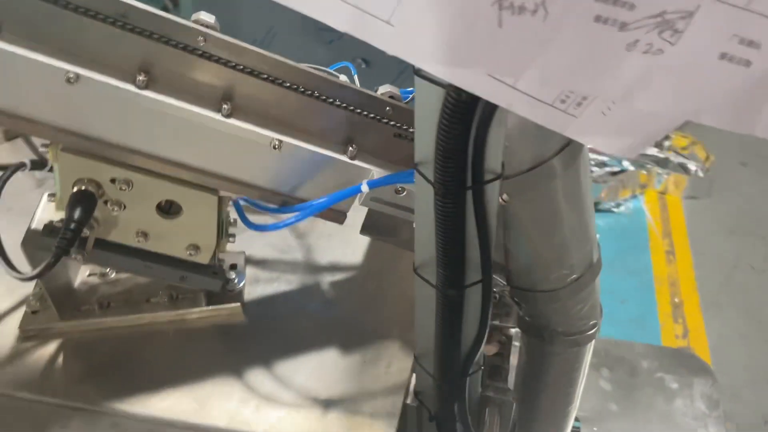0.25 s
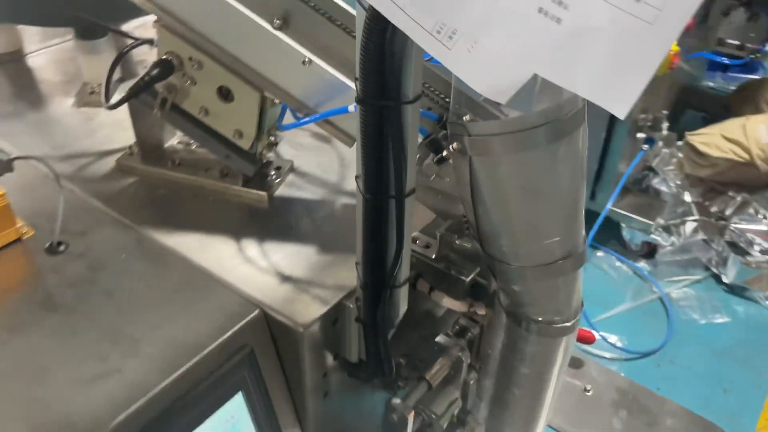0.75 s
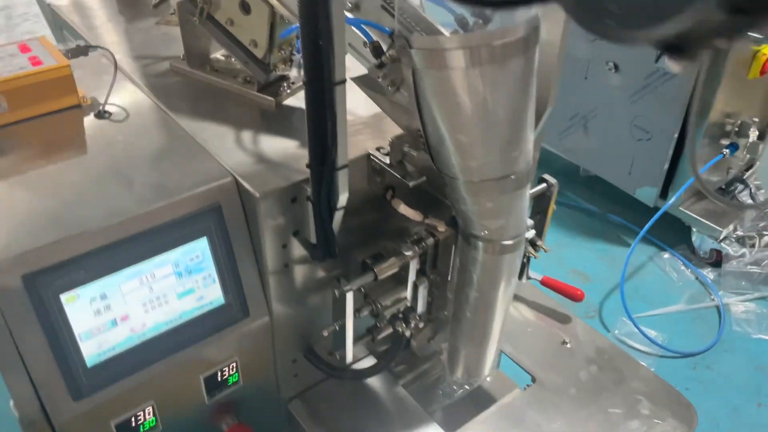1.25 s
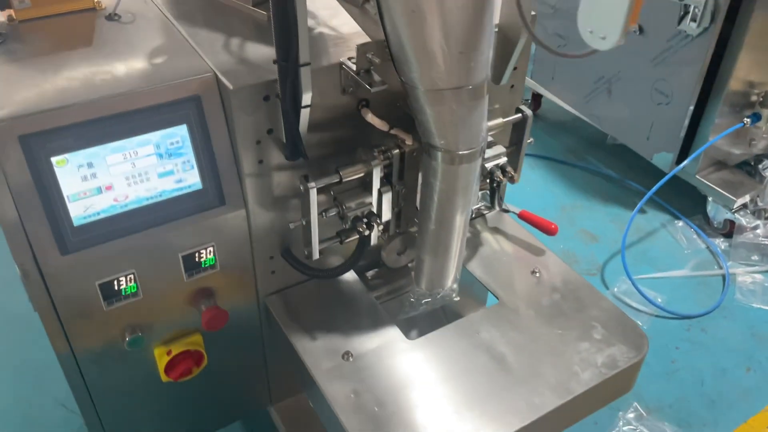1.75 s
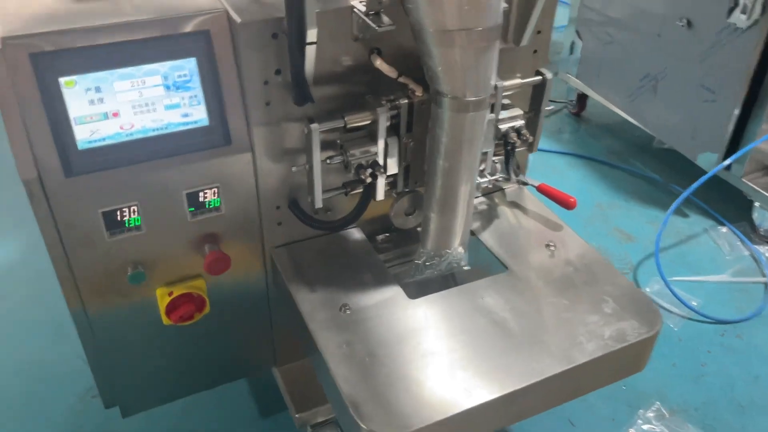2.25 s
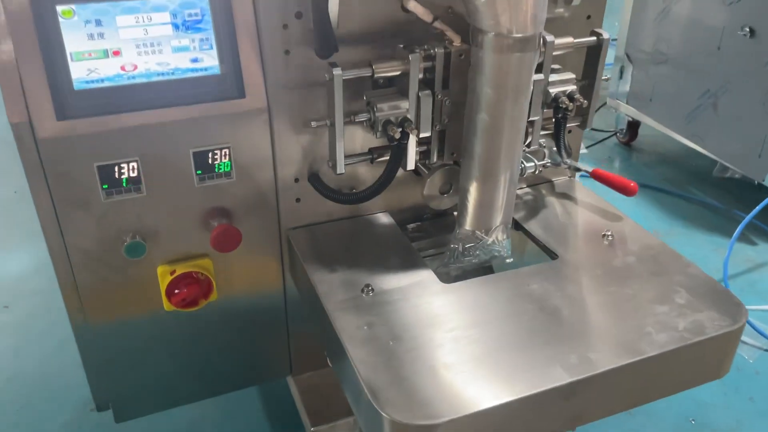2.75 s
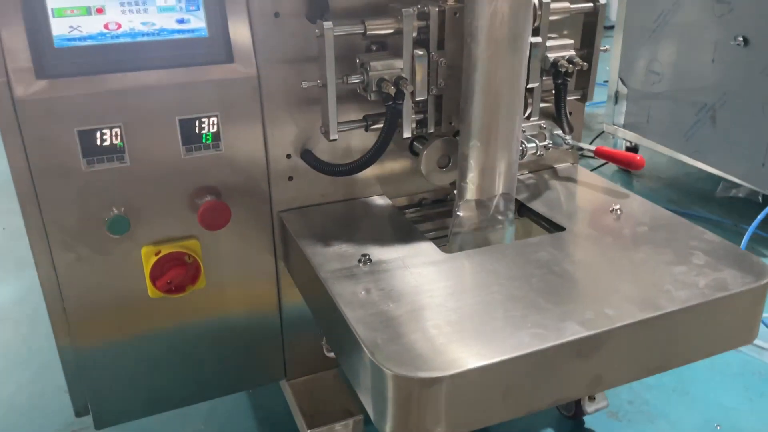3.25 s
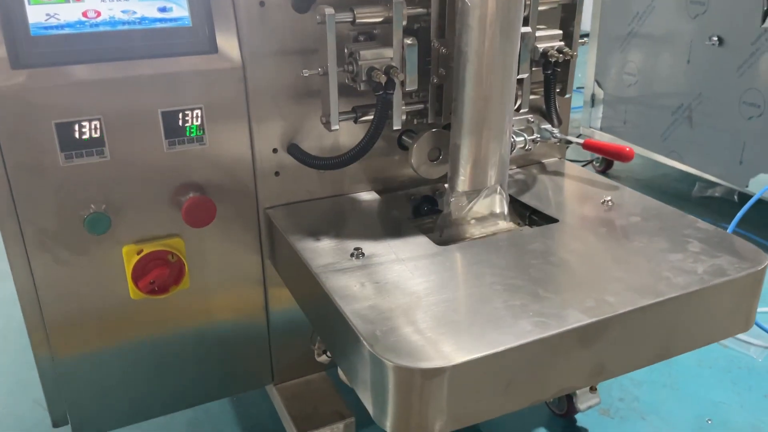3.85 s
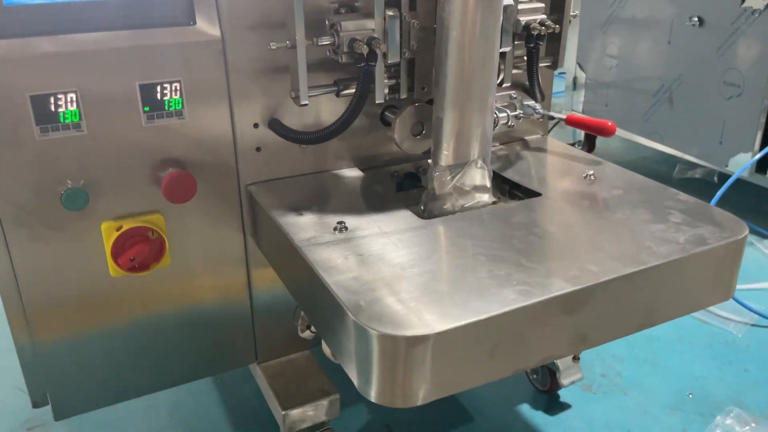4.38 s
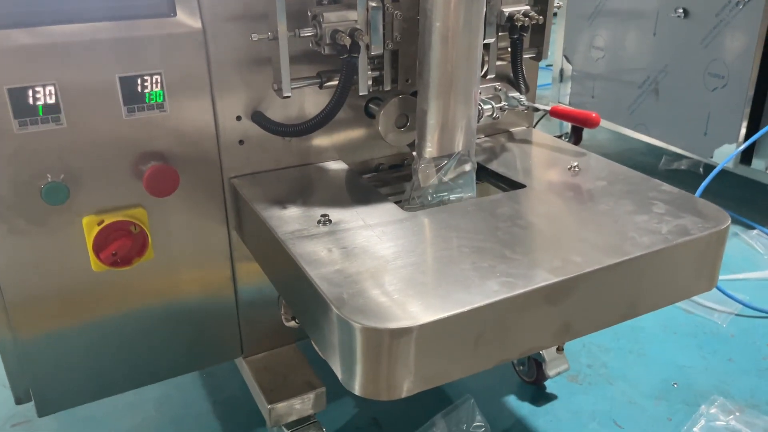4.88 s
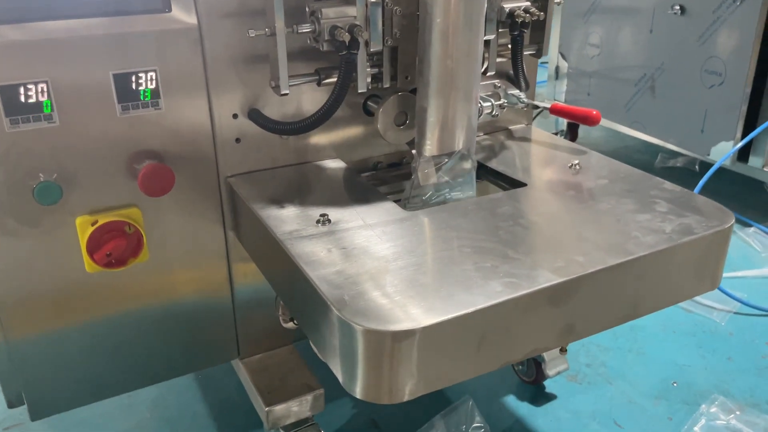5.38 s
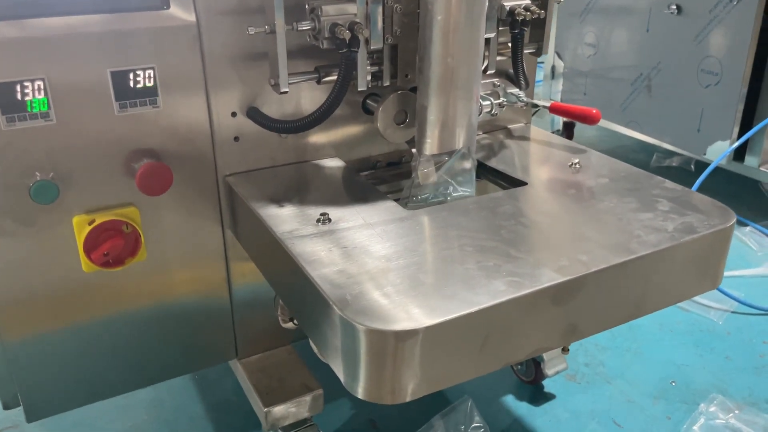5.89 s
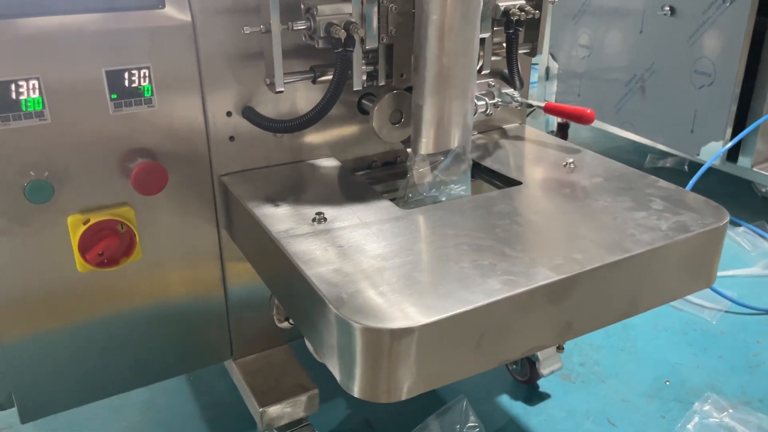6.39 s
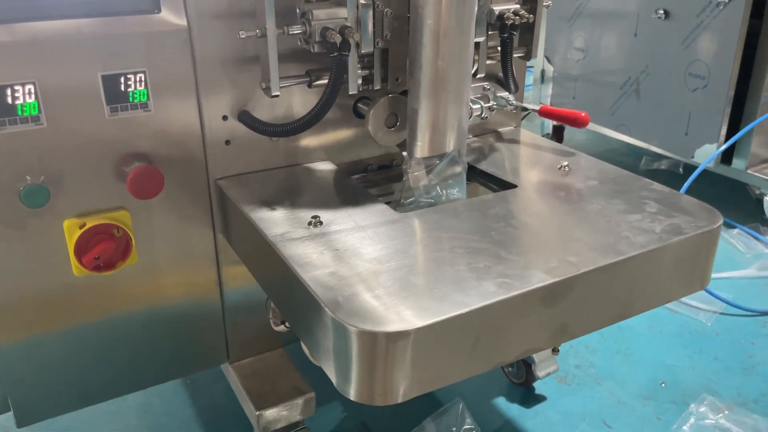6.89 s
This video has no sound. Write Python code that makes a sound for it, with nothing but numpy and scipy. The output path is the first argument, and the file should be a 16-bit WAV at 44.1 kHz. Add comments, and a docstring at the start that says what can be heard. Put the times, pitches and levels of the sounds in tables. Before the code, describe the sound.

Bright, dense metallic screw rattle and mains-pitched hum open the scene, with handfuls crackling into a steel chute and steady knocks fading. The hum cuts off, returns for an instant, and leaves thin rumble and scattered clinks. Clustered hollow clanks from the jaws build midway, pause, and give way to a louder buzzing feeder and continuous screws. Heard close on a handheld stereo phone in a factory.

```python
"""A screw packing machine in a factory hall, heard through a phone's two microphone ports.
From the start a vibrating feeder hums at the mains pitch and screws rattle along steel tracks, over rumble, drone
and hiss; handfuls of screws, shaped noise and ringing modes, clatter in the chute while the conveyor knocks evenly.
At 1.3 s a sine squeaks upward and the hum soon sinks, to return briefly near 1.8 s; from 3.1 s the sealing jaws knock
on the ringing frame. After 5.1 s single tones swell and fade as a second feeder comes up and the screws go on."""
import sys
import numpy as np
from scipy import signal
from scipy.fft import rfft, irfft, next_fast_len
from scipy.io import wavfile

SR = 44100
rng = np.random.default_rng(int(sys.argv[2]) if len(sys.argv) > 2 else 0)


def generate_wav(signal):
    """Clip the signal to [-1, 1] and save it as 16-bit WAV at the path in sys.argv[1]."""
    frames = np.transpose(np.atleast_2d(signal))
    scaled = np.clip(frames, -1, 1) * 32767
    pcm = np.round(scaled).astype(np.int16)
    wavfile.write(sys.argv[1], SR, pcm)


N = 314433   # samples
T = np.arange(N) / SR   # seconds
HZ = np.maximum(np.fft.rfftfreq(next_fast_len(N), 1 / SR), 1)   # frequency grid

# Feeder spells. Each row: full stroke from in seconds, switched off at in seconds, hum reference level in dB.
FIRST_FEEDER_RUNS = [(0.0, 1.355, -38.5)]
BRIEF_FEEDER_RUNS = [(1.76, 1.85, -35.5)]
SECOND_FEEDER_RUNS = [(5.33, 8.0, -27)]
# Harmonics of each feeder's hum. Each row: multiple of the mains pitch, level against the hum reference in dB.
FIRST_FEEDER_ORDERS = [(1, 11), (2, -4), (3, -2), (5, -1), (6, 3.5), (7, 2.5), (8, 0.5), (9, 0)]
BRIEF_FEEDER_ORDERS = [(1, -1), (2, -0.5), (3, -12)]
SECOND_FEEDER_ORDERS = [(1, 6), (2, -7.5), (3, -8), (4, -17), (5, -7), (6, -13.5), (7, -1.5), (8, -5),
                        (9, 4), (10, 1.5), (18, 1), (19, -5), (21, -10.5), (22, -10), (23, -14), (30, -7.5)]
MAINS_HZ = 50.0
RUN_UP_DB_PER_S, RUN_DOWN_DB_PER_S = 95, 60
BUZZ_DB = -13.5   # added to the orders above the fourth

# Colours of frame rumble, motor drone and screws on steel. Each row: frequency in Hz, relative level in dB per Hz.
RUMBLE_COLOUR = [(21, -37), (35, 12), (65, 3.5), (91, -11), (117, -2.5), (172, -9.5), (253, -14),
                 (400, -18), (520, -22), (880, -120)]
DRONE_COLOUR = [(120, -11), (200, 0.5), (470, 0.5), (730, -8.5), (900, -3.5), (1200, -6), (1500, -5),
                (2000, -6.5), (3000, -5), (5000, -10), (9000, -21), (16000, -46)]
SCREW_COLOUR = [(900, -7.5), (1500, -10), (2200, -7.5), (3000, -8), (4500, 1), (6200, -1), (8000, 2),
                (10500, 0.5), (13000, -6), (14500, -2.5), (15700, 4)]
# Loudness of frame rumble, motor drone and track rattle. Each row: time in seconds, level in dB.
RUMBLE_LEVEL = [(0.0, -41), (0.5, -41), (1.35, -34.5), (1.67, -33.5), (1.87, -26), (2.06, -39),
                (2.8, -40.5), (3.22, -29), (3.5, -31), (3.62, -30.5), (3.95, -28.5), (4.31, -35.5),
                (4.63, -26.5), (4.96, -34), (5.3, -25.5), (5.86, -28), (6.5, -33.5), (7.13, -30)]
DRONE_LEVEL = [(0.0, -34), (0.75, -38.5), (1.1, -34), (1.67, -45.5), (1.9, -39.5), (2.46, -39.5),
               (2.8, -45.5), (3.53, -48.5), (3.95, -35), (4.1, -41), (4.31, -35.5), (4.68, -32),
               (4.94, -44), (5.15, -51), (5.22, -38), (5.58, -30.5), (7.13, -34)]
RATTLE_LEVEL = [(0.0, -23.5), (0.75, -25.5), (1.35, -28.5), (1.45, -41.5), (1.87, -36.5), (2.06, -33),
                (2.46, -43), (2.62, -34.5), (2.8, -61), (3.05, -48.5), (3.15, -33), (3.5, -53),
                (3.62, -38.5), (3.85, -46), (3.97, -35), (4.08, -45.5), (4.31, -33.5), (4.53, -31.5),
                (4.73, -38), (4.85, -50), (4.95, -51), (5.07, -69), (5.14, -33), (5.22, -29.5),
                (5.58, -26.5), (7.13, -27)]
# Resonances of the steel track. Each row: frequency in Hz, width in Hz, relative level in dB.
TRACK_MODES = [(2965, 63, 7.5), (3660, 37, -3.5), (4160, 13, -11), (4230, 14, -10), (4460, 8.3, 3),
               (4700, 10, 3), (5070, 15, -1), (5680, 53, 3.5), (6230, 22, 11), (6640, 36, 7),
               (7500, 36, 12), (9800, 20, -1)]

# Lingering narrow bands of hiss. Each row: start in seconds, end in seconds, frequency in Hz, width in Hz, level in dB.
HISS_BANDS = [(0.0, 1.45, 6490, 40, -39.5), (0.116, 1.398, 2800, 250, -38.5),
              (1.722, 2.624, 2770, 297, -46), (2.61, 2.924, 4650, 200, -50), (3.044, 3.362, 5940, 120, -52),
              (3.505, 3.733, 2270, 200, -46), (4.05, 4.208, 4500, 303, -41.5)]
HISS_RISE_S, HISS_HOLD_SHARE = 0.016, 0.45   # the hold is a share of the band's length

# Screws clatter in the chute. Each row: start in seconds, nominal peak in dB, decay t60 in seconds,
# best-excited pitch in Hz, spray above 8 kHz against the rest in dB.
HANDFULS = [(0.13, -25, 0.31, 4250, 4), (0.168, -29, 0.22, 2840.0, -6), (0.207, -21.5, 0.18, 5120.0, 7),
            (0.245, -23.5, 0.17, 2940, 3.5), (0.6506, -24.5, 0.1, 2890.0, 2),
            (0.966, -21.5, 0.08, 4670, 10), (0.9876, -23.5, 0.19, 4650.0, 6), (1.02, -24, 0.27, 4900, 7),
            (1.072, -22.5, 0.15, 5920.0, 11), (1.144, -26, 0.21, 2970, 3), (1.158, -33, 0.12, 4300, -3),
            (1.45, -29, 0.073, 5000.0, 11), (1.699, -32, 0.43, 3300, 4.5), (1.754, -25, 0.38, 3100, 5),
            (2.245, -33.0, 0.43, 4970, 0), (2.506, -22.5, 0.28, 4300, 4), (2.58, -30, 0.073, 6500.0, 10),
            (3.38, -35.5, 0.031, 4420, 5), (3.515, -41, 0.91, 2220, 1), (3.551, -30, 0.078, 4910.0, 12),
            (3.8197, -27, 0.12, 3530.0, 3), (3.8267, -22.5, 0.089, 6420.0, 2),
            (3.844, -20.5, 0.12, 4830, 5), (3.8794, -22.5, 0.1, 3000, 11), (3.891, -25, 0.13, 4410.0, -10),
            (3.9764, -36, 0.051, 4050.0, -5), (3.988, -27.5, 0.074, 6400.0, 7),
            (4.018, -36.5, 0.23, 3660, 13), (4.061, -26, 0.09, 6850, 4), (4.203, -34.5, 0.16, 2650.0, -21),
            (4.3209, -35, 0.31, 2830, -8), (4.35, -28, 0.14, 4960, 4), (4.484, -26.5, 0.12, 3070, 8),
            (4.5805, -23, 0.092, 4420, -1), (4.613, -20, 0.28, 6500, 3), (4.675, -28, 0.046, 3150, -4),
            (5.1525, -27.5, 0.082, 2850, 8), (5.4065, -25, 0.12, 4430, -2), (5.4565, -32, 0.092, 2780.0, 7),
            (5.53, -15.5, 0.09, 4240, 5), (5.554, -26, 0.3, 2970.0, 1), (5.57, -22.5, 0.13, 2920, -1),
            (5.588, -18.5, 0.076, 4300, -7), (5.615, -26.5, 0.21, 6140.0, 3),
            (5.952, -30.5, 0.22, 6090.0, -1), (6.1935, -20, 0.09, 4030.0, 9),
            (6.259, -20.5, 0.093, 3900, 12), (6.267, -21, 0.05, 4580, 2), (6.2745, -18, 0.05, 6000, 3),
            (6.2805, -22.5, 0.088, 3550, -3), (6.307, -18.5, 0.11, 5700, 3), (6.337, -19, 0.11, 4600, 7),
            (6.346, -21.5, 0.29, 4740, 6), (6.3773, -15, 0.078, 4260, -1), (6.39, -18.5, 0.14, 4170, -4),
            (6.476, -23.0, 0.28, 3800, 7), (7.032, -23, 0.23, 4050, 8), (7.1147, -15.0, 0.09, 3960, 6.5)]
# Modes of the chute. Each row: frequency in Hz, relative level in dB, ringing t60 in seconds.
CHUTE_MODES = [(2260, -8, 0.024), (2897, -10, 0.11), (3066, -4.5, 0.041), (3296, -4.5, 0.032),
               (3630, -5.5, 0.035), (3926, -6, 0.04), (4430, -7.5, 0.058), (4560, -4, 0.014),
               (4810, -20, 0.014), (4980, -26, 0.015), (5850, -7, 0.041), (6700, -41, 0.26),
               (9110, 6.5, 0.02)]
CONTACTS_PER_S, CONTACT_SIZE_DB = 2100, -2   # single contacts within a spray
SPRAY_BLUR, SPRAY_LUMP_DB = 2.4, 1.16   # steady part between contacts; unevenness of a spray
SPRAY_RISE_S = 0.0036
TREBLE_SHARE, CHUTE_DRIVE_SHARE = 0.64, 0.58   # shares of a handful's t60: spray above 8 kHz, drive of the chute
CHUTE_STRIKE_DB = 11.5   # the clean first contact on the chute's modes
# The first screw lands with a short tick that reaches lower than the spray.
TICK_DB, TICK_T60_S, TICK_LOW_HZ = -1.5, 0.028, 1480

# The conveyor knocks at an even pace; its frame ring grows fainter with each step, while thump and crash stay level.
STEPS, FIRST_STEP_S, STEP_S, STEP_FADE_DB = 7, 0.257, 0.4, 6.5
STEP_DB, STEP_THUMP_DB, STEP_CRASH_DB = -19, -35.5, -30   # frame at the first step, base, panels
STEP_HZ, STEP_T60_S = 550, 0.11   # best-excited pitch, shudder
STEP_LEAD_S, STEP_LEAD_DB = 0.022, -2   # a softer contact comes just before each step

# The sealing jaws knock on the frame. Each row: start in seconds, nominal peak in dB, low thump in dB,
# broad crash in dB, best-excited pitch in Hz, shudder t60 in seconds.
JAW_KNOCKS = [(3.129, -36.5, -48, -37.5, 417, 0.61), (3.186, -39, -25.5, -36, 404, 0.14),
              (3.521, -40, -20, -34.5, 496, 0.25), (3.556, -26, -50, -35, 513, 0.31),
              (3.65, -27.5, -49, -28.5, 387, 0.094), (3.7442, -17, -24, -24.5, 393, 0.13),
              (3.7745, -33, -12.5, -29.5, 950, 0.37), (3.807, -21.5, -18.5, -33, 320, 0.16),
              (3.878, -33, -20, -44, 413, 0.2), (3.914, -23, -24, -37, 410, 0.15),
              (3.955, -26, -43, -30, 460, 0.13), (3.983, -25, -40, -40, 487, 0.093),
              (4.02, -27, -22, -37.5, 426, 0.18), (4.071, -30, -26, -42, 420, 0.14),
              (4.2, -21, -41, -28.5, 465, 0.28), (4.23, -21, -33, -44, 477, 0.46),
              (4.334, -32, -22, -46, 434, 0.9), (4.592, -16.5, -31, -23.5, 340, 0.22),
              (4.619, -16, -24, -22.5, 780, 0.31), (4.676, -18, -46, -29.5, 920, 0.48),
              (5.144, -40, -28, -31, 507, 0.6)]
# Modes of the frame, then of the machine base. Each row: frequency in Hz, relative level in dB, ringing t60 in seconds.
FRAME_MODES = [(262, 9, 0.2), (297, 4.5, 0.25), (396, 10.5, 0.08), (431, 4.5, 0.16), (463.3, 9, 0.16),
               (540, 2.5, 0.081), (790, -5, 0.15), (1010, -10, .1), (1200, 9, .08), (1440, 14, 0.11)]
BASE_MODES = [(79.4, 4, 0.079), (96.7, 9, 0.1), (112, 2, 0.1), (161.5, -4.5, 0.21)]
# Colour of the crash in the loose panels. Each row: frequency in Hz, relative level in dB per Hz.
CRASH_COLOUR = [(150, 14.5), (400, 10), (900, 6.5), (1500, 4.5), (2000, -10.5), (3000, -1), (4000, -31),
                (16000, -53)]
FRAME_STRIKE_DB, BASE_STRIKE_DB = -12, -11.5   # the clean first click of a blow
BASE_SHUDDER_DB = -43   # the shaking that follows a shove of the base

# A short rising squeak. Each row: time in seconds, pitch in Hz, level in dB.
SQUEAK_GLIDE = [(1.315, 1026, -58), (1.33, 1060, -43), (1.356, 1280, -42), (1.375, 1320, -65)]
# Tones while the second feeder settles. Each row: start in seconds, end in seconds, pitch in Hz, level in dB.
SETTLING_TONES = [(5.1502, 5.6, 100, -33), (5.4059, 5.74, 63.8, -29)]

# How alike the two microphone ports hear the hall. Each row: frequency in Hz, likeness from 0 to 1.
PORT_LIKENESS = [(60, 0.99), (300, 0.96), (640, 0.91), (1400, 0.42), (2500, 0.55), (4500, 0.59),
                 (6500, 0.44), (7600, 1), (16000, 1)]
# Phase between the ports. Each row: frequency in Hz, lead of the left in half turns.
PORT_PHASE = [(20, 0), (400, 0), (690, .16), (2070, -.03), (2930, .29), (3960, -.06), (5000, .16),
              (6290, -.16), (6900, -.4), (7600, -.9), (8900, -1.1), (10300, -1.85), (13000, -2.15),
              (14000, -2.9), (16000, -3.1)]
# Balance of the ports. Each row: frequency in Hz, left minus right in dB.
PORT_BALANCE = [(60, .6), (200, .4), (400, 0), (1000, 1.5), (2400, 3), (4400, 2), (6500, 1), (7500, 0)]
LOW_CUT_HZ, CUTOFF_HZ = 61.8, 15800


def from_db(db):
    """Decibels to gain."""
    return 10 ** (np.asarray(db) / 20)


def rms_one(x):
    """Scale to unit rms."""
    return x / np.sqrt(np.mean(x ** 2) + 1e-20)


def in_time(rows):
    """Columns of a time table at every sample."""
    s, *columns = np.transpose(rows)
    return [np.interp(T, s, column) for column in columns]


def at_hz(points, hz):
    """A spectrum table read on a log-frequency axis."""
    at, value = np.transpose(points)
    return np.interp(np.log(hz), np.log(np.maximum(at, 1)), value)


def shaped(x, response):
    """Filter by a response given on the frequency grid."""
    size = next_fast_len(N)
    return irfft(rfft(x, size) * response, size)[..., :N]


def drift(rate):
    """Random wander of spread 1, from noise through two equal low-pass poles at `rate` Hz."""
    r = np.exp(-2 * np.pi * rate * 40 / SR)   # one point every 40 samples
    slow = signal.lfilter([1], [1, -2 * r, r * r], rng.standard_normal(N // 40 + 2002))
    slow = slow[2000:]   # leave out the filter's start
    return np.interp(np.arange(N) / 40, np.arange(len(slow)), rms_one(slow))


def ring(x, hz, t60):
    """A resonance: a unit click sets a sine of height 1 ringing."""
    r, w = from_db(-60 / (t60 * SR)), 2 * np.pi * hz / SR
    return signal.lfilter([0, np.sin(w)], [1, -2 * r * np.cos(w), r * r], x + 1e-18)


def t60_of(width_hz):
    """Decay time of a resonance of the given width."""
    return np.log(1000) / np.pi / width_hz


def bursts(at_s, peak_db, t60, rise_s):
    """Envelope of events that rise fast and die away, added in power."""
    power = np.zeros(N)
    for s, db, decay in zip(at_s, peak_db, t60):
        first = int(s * SR)
        age = T[:min(int(decay * SR), N - first)]
        shape = (1 - np.exp(-age / rise_s)) * from_db(db - 60 * age / decay)
        power[first:first + len(age)] += shape ** 2
    return np.sqrt(power)


def strikes(at_s, peak_db):
    """One click per event, the second field with the same clicks 2 ms later."""
    clicks = np.zeros(N)
    clicks[(at_s * SR).astype(int)] = from_db(peak_db)
    return np.array([clicks, np.roll(clicks, 90)])


def feeder(runs, orders, peak_s, waver_db):
    """The magnet pulls once a mains cycle: low harmonics in step make a rounded peak, panels buzz on the upper ones."""
    spells_db = []
    for full, off, db in runs:
        run_up = RUN_UP_DB_PER_S * np.maximum(full - T, 0)
        run_down = RUN_DOWN_DB_PER_S * np.maximum(T - off, 0)
        spells_db.append(db - run_up - run_down)
    hum_db = np.max(spells_db, axis=0)
    turn = 2 * np.pi * MAINS_HZ * (T - peak_s)
    phases = rng.uniform(0, 2 * np.pi, len(orders))
    tones = 0
    for (k, db), phase in zip(orders, phases):
        upper = k > 4
        level_db = hum_db + upper * BUZZ_DB + db + waver_db * drift(2.56)
        tones = tones + from_db(level_db) * np.cos(k * turn + upper * phase)
    hum = np.sqrt(2) * tones
    return np.array([hum, np.roll(hum, 170)])   # second field 4 ms later


def machine_noise(level_db, colour, patchy_db, rate):
    """Rumble or drone of the machine: coloured noise with a lumpy level."""
    noise = shaped(rng.standard_normal((2, N)), from_db(at_hz(colour, HZ)))
    return from_db(level_db + patchy_db * drift(rate)) * rms_one(noise)


def track_rattle(level_db, per_s, size_db, ring_db):
    """Screws hop on the shaken track: dense uneven ticks that also ring the track's resonances."""
    sizes = from_db(size_db * np.minimum(rng.exponential(1, (2, N)), 5))
    sizes = sizes * rng.choice([-1, 1], (2, N))
    ticks = rms_one(sizes * (rng.random((2, N)) < per_s / SR))
    ticks = ticks + 2.0 * rng.standard_normal((2, N))
    rings = 0
    for hz, width, db in TRACK_MODES:
        rings = rings + from_db(db + 4.5 * drift(3.0)) * rms_one(ring(ticks, hz, t60_of(width)))
    # each of eight bands swells and thins on its own
    centres = np.geomspace(1000, 13000, num=8)
    shares = np.exp(-(np.log2(HZ / centres[:, None]) / .5) ** 2) + 1e-9
    colour = from_db(at_hz(SCREW_COLOUR, HZ))
    broad = 0
    for share in shares / shares.sum(axis=0):
        broad = broad + from_db(2.7 * drift(4.8)) * shaped(ticks, colour * share)
    mix = rms_one(broad) + from_db(ring_db) * rms_one(rings)
    return from_db(level_db + 0.37 * drift(33)) * rms_one(mix)


def hiss_bands():
    """Noise through a resonance, fading in quickly, holding, and fading out more slowly."""
    out = 0
    for start, end, hz, width, db in HISS_BANDS:
        risen = start + HISS_RISE_S
        held = risen + HISS_HOLD_SHARE * (end - start)
        swell = np.interp(T, [start, risen, held, end], [0, 1, 1, 0])
        band = rms_one(ring(rng.standard_normal((2, N)), hz, t60_of(width)))
        out = out + from_db(db) * swell * band
    return out


def clatter(ring_db, reach_db):
    """Each handful is a broad spray of contacts that leaves the chute ringing, most near the handful's own pitch."""
    s, peak_db, t60, best_hz, treble_db = np.transpose(HANDFULS)
    sizes = from_db(CONTACT_SIZE_DB * np.minimum(rng.exponential(1, N), 2.5))
    contacts = rms_one(sizes * (rng.random(N) < CONTACTS_PER_S / SR))
    density = (contacts + SPRAY_BLUR) * from_db(SPRAY_LUMP_DB * drift(153))
    grain = rng.standard_normal((2, N)) * rms_one(density)

    colour = from_db(at_hz(SCREW_COLOUR, HZ)) / (1 + (2400 / HZ) ** 4)
    below = 1 / (1 + (HZ / 8200) ** 8)   # the part below the treble
    spray = bursts(s, peak_db, t60, SPRAY_RISE_S) * rms_one(shaped(grain, colour * below))
    treble = rms_one(shaped(grain, colour * (1 - below)))
    spray += bursts(s, peak_db + treble_db, TREBLE_SHARE * t60, 0.0027) * treble
    tick = bursts(s, peak_db + TICK_DB, np.full(len(s), TICK_T60_S), 0.0014)
    spray += tick * rms_one(shaped(grain, below / (1 + (TICK_LOW_HZ / HZ) ** 4)))

    # every handful hits the modes with new strengths
    strength_db = rng.normal(0, 2.5, (len(s), len(CHUTE_MODES)))
    rings = 0
    for k, (hz, db, decay) in enumerate(CHUTE_MODES):
        off_pitch_db = np.minimum(reach_db * np.abs(np.log2(hz / best_hz)), 9)
        level_db = peak_db + db + strength_db[:, k] - off_pitch_db
        drive = strikes(s, level_db + CHUTE_STRIKE_DB)
        drive = drive + bursts(s, level_db, CHUTE_DRIVE_SHARE * t60, 0.0035) * grain
        rings = rings + (-1) ** k * ring(drive, hz, decay)
    return spray + from_db(ring_db) * rings


def conveyor_steps():
    """Rows like those of the jaw knocks: for each step of the conveyor a soft contact, then the knock."""
    rows = []
    for k in range(STEPS):
        for lead_s, lead_db in [(STEP_LEAD_S, STEP_LEAD_DB), (0, 0)]:
            at_s = FIRST_STEP_S + k * STEP_S - lead_s
            frame_db = STEP_DB - k * STEP_FADE_DB + lead_db
            rows.append((at_s, frame_db, STEP_THUMP_DB + lead_db, STEP_CRASH_DB + lead_db, STEP_HZ, STEP_T60_S))
    return rows


def knocks(reach_db, shudder_db, crash_share):
    """A blow rings the frame, most near its own pitch, and shudders on; it shoves the base and crashes in the panels."""
    s, peak_db, thump_db, crash_db, best_hz, t60 = np.transpose(conveyor_steps() + JAW_KNOCKS)
    shaking = rng.standard_normal((2, N)) * from_db(2 * drift(95))   # loose parts rattle unevenly
    crash = rms_one(shaped(shaking, from_db(at_hz(CRASH_COLOUR, HZ))))
    out = bursts(s, crash_db, crash_share * t60, 0.0009) * crash
    for k, (hz, db, decay) in enumerate(FRAME_MODES):
        level_db = peak_db + db - np.minimum(reach_db * np.abs(np.log2(hz / best_hz)), 18)
        drive = strikes(s, level_db + FRAME_STRIKE_DB)
        drive = drive + bursts(s, level_db + shudder_db, t60, 0.0019) * shaking
        out += (-1) ** k * ring(drive, hz, decay)
    for hz, db, decay in BASE_MODES:
        drive = strikes(s, thump_db + BASE_STRIKE_DB + db)
        drive = drive + bursts(s, thump_db + db + BASE_SHUDDER_DB, t60, 0.0018) * shaking
        out += ring(drive, hz, decay)
    return out


def squeak():
    """A slightly rough sine that slides upward."""
    hz, db = in_time(SQUEAK_GLIDE)
    tone = from_db(db + 4.5 * drift(70)) * np.sin(2 * np.pi * np.cumsum(hz) / SR)
    return np.array([tone, tone])


def settling():
    """Tones that swell and fade; the one off the mains pitch beats with the hum."""
    tone = 0
    for start, end, hz, db in SETTLING_TONES:
        swell = np.sin(np.pi * np.clip((T - start) / (end - start), 0, 1))
        tone = tone + from_db(db) * swell * np.sqrt(2) * np.cos(2 * np.pi * hz * (T - start))
    return np.array([tone, tone])


def ports(common, apart):
    """Two ports share part of the sound; the phase between them turns with frequency."""
    alike = at_hz(PORT_LIKENESS, HZ)
    side = np.array([[1], [-1]])   # left, right
    balance = from_db(side * at_hz(PORT_BALANCE, HZ) / 2)
    turn = balance * np.exp(.5j * np.pi * side * at_hz(PORT_PHASE, HZ))
    shared = shaped(common, np.sqrt((1 + alike) / 2) * turn)
    unshared = shaped(apart, side * np.sqrt((1 - alike) / 2) * turn)
    return shared + unshared


def scene():
    """All sources as a shared and an unshared sound field, picked up at the two ports."""
    (rumble_db,), (drone_db,), (rattle_db,) = in_time(RUMBLE_LEVEL), in_time(DRONE_LEVEL), in_time(RATTLE_LEVEL)
    hum = feeder(FIRST_FEEDER_RUNS, FIRST_FEEDER_ORDERS, peak_s=0.0106, waver_db=2.5)
    hum = hum + feeder(BRIEF_FEEDER_RUNS, BRIEF_FEEDER_ORDERS, peak_s=0.0113, waver_db=-1.5)
    hum = hum + feeder(SECOND_FEEDER_RUNS, SECOND_FEEDER_ORDERS, peak_s=0.0102, waver_db=2.14)
    rumble = machine_noise(rumble_db, RUMBLE_COLOUR, patchy_db=1.5, rate=7.6)
    drone = machine_noise(drone_db, DRONE_COLOUR, patchy_db=2.5, rate=12.0)
    rattle = track_rattle(rattle_db, per_s=2500, size_db=2.0, ring_db=-15.0)
    screws = clatter(ring_db=-14.5, reach_db=65)   # reach in dB per octave
    blows = knocks(reach_db=53, shudder_db=-39.0, crash_share=1.09)
    fields = hum + rumble + drone + rattle + hiss_bands() + screws + blows + squeak() + settling()
    return ports(*fields)


def record(dry):
    """The microphone drops the deepest bass; the top is cut."""
    dry = shaped(dry, 1 / np.sqrt(1 + (LOW_CUT_HZ / HZ) ** 8))
    top_cut = signal.ellip(12, .5, 75, CUTOFF_HZ, fs=SR, output="sos")
    return signal.sosfilt(top_cut, dry)


dry = scene()
out = record(dry)
generate_wav(out)
```